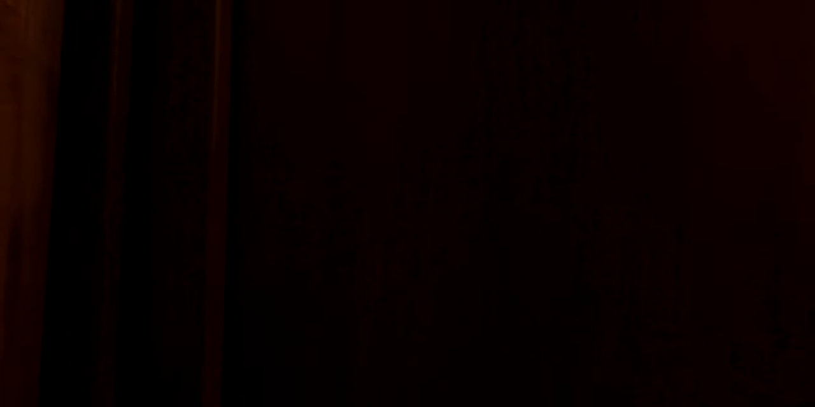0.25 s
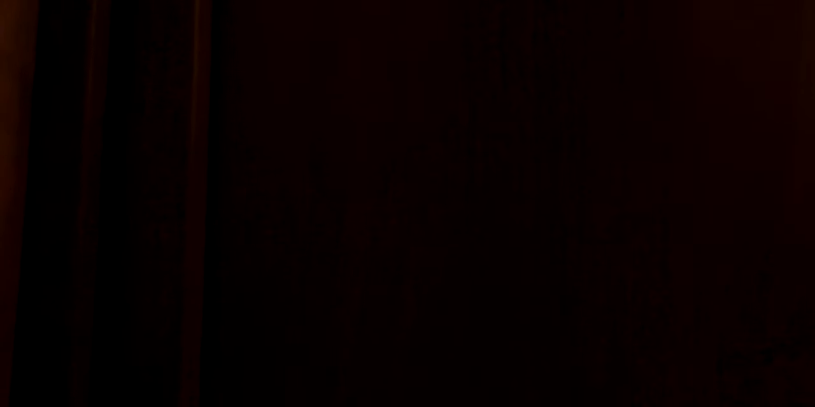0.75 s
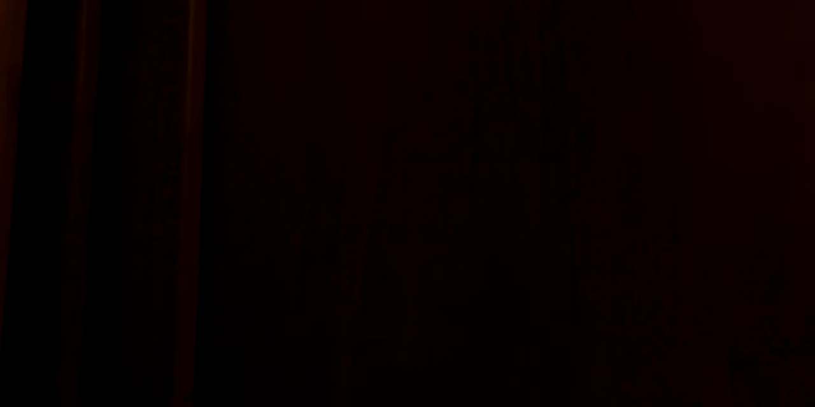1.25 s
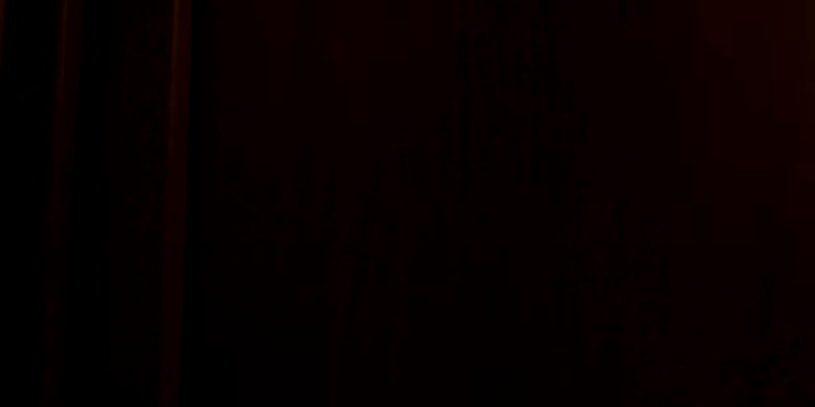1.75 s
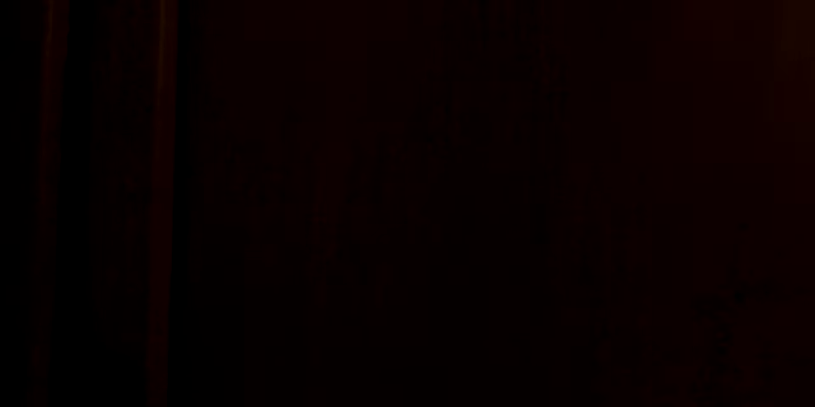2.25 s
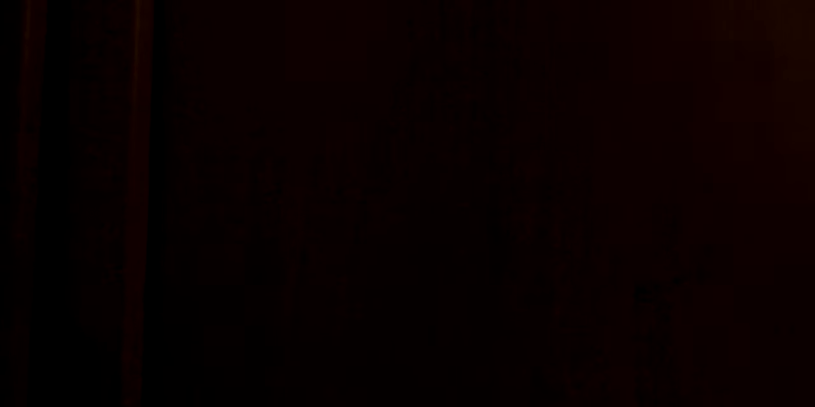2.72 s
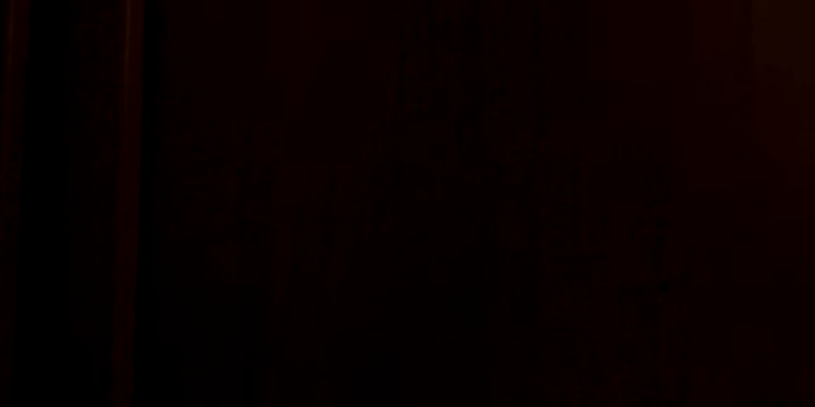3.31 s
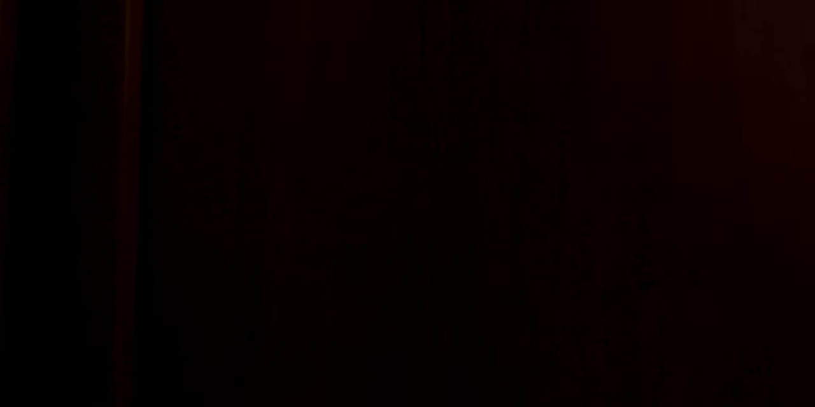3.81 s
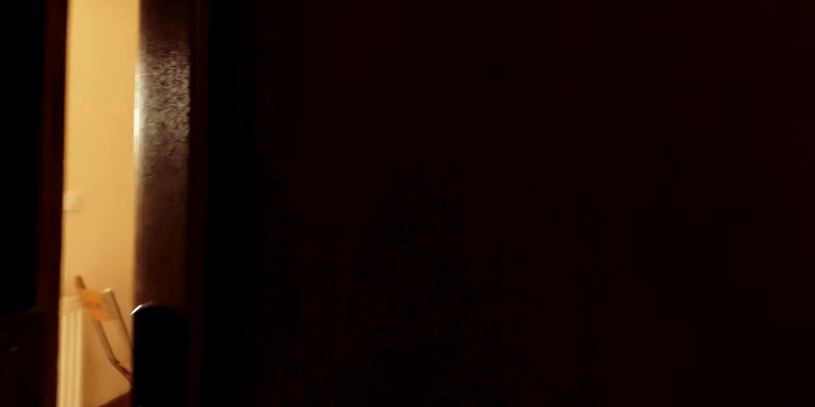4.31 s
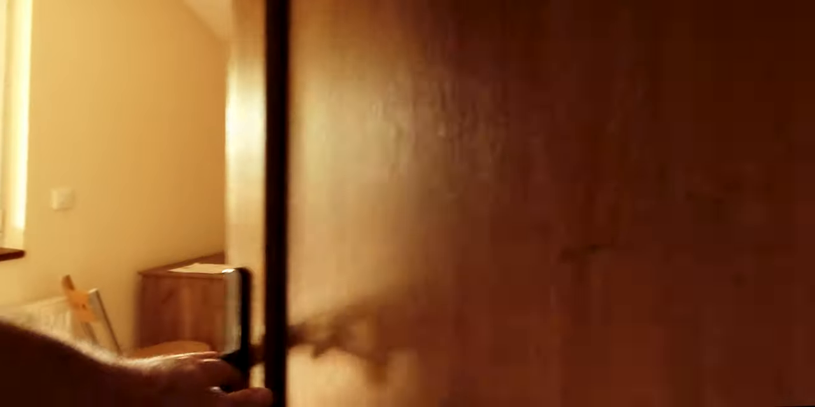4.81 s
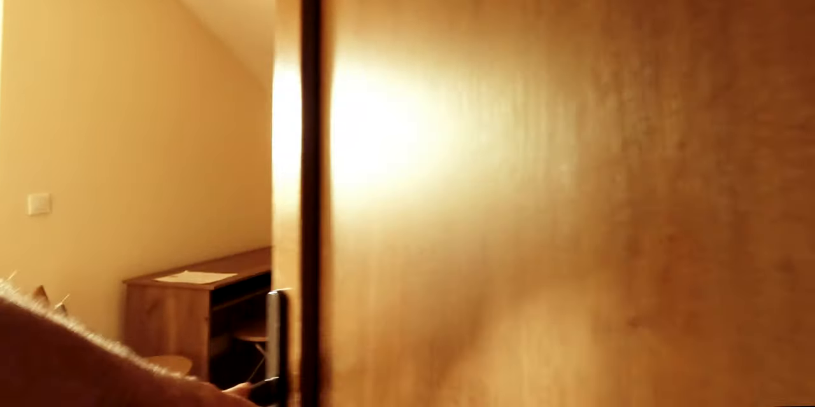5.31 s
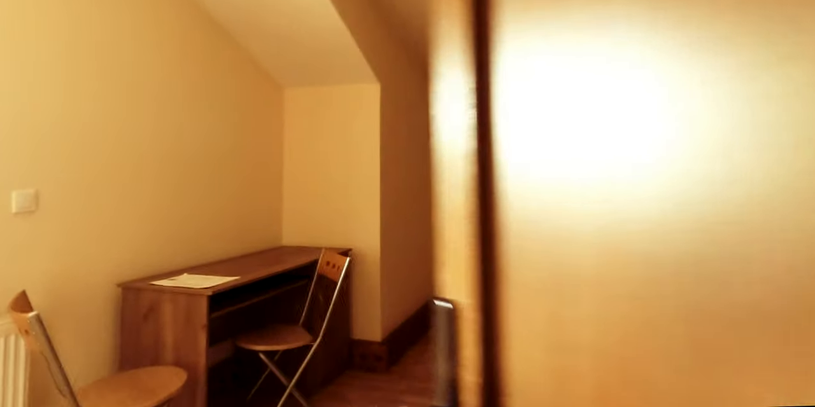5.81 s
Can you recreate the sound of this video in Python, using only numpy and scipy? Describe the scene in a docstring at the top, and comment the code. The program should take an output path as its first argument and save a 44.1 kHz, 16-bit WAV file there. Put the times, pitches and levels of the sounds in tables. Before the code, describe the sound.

Very close to a hand-held stereo microphone in a quiet, bare-walled hallway, keys jangle in dense, sharp, bright clicks, slightly to the left. Duller knocks and gritty scraping come from the lock, with low thumps of the wooden door and handling rumble. The rattling comes in bursts, thins after two seconds, flares again around three, then gives way to the door swinging open with a soft rub and a very faint high hinge whistle.

```python
"""A bunch of keys rattles while a hand works a door lock, close to a hand-held stereo microphone in a hallway.
Keys and lock are bodies with resonant modes, struck by short bursts of contact noise or rubbed by gritty noise.
Short metal tones and a faint, gliding hinge whistle are tones of wandering pitch; rubs also sing in narrow
bands. The pushed door leaf hums in its panel modes and the hand rumbles on the microphone, both as swelling
noise. Decaying noise gives the echo of the bare walls, over the steady quiet of the house."""
import sys
import numpy as np
from scipy import signal
from scipy.fft import rfft, irfft
from scipy.io import wavfile
from scipy.ndimage import uniform_filter1d

SR = 44100
rng = np.random.default_rng(int(sys.argv[2]) if len(sys.argv) > 2 else 0)


def log_audio(samples):
    """Write samples as a 16-bit WAV file to the path given in sys.argv[1]."""
    # one column per channel
    frames = np.atleast_2d(samples).T
    # limit to full scale, then quantise
    limited = np.clip(frames, -1, 1)
    pcm = np.round(limited * 32767).astype(np.int16)
    wavfile.write(sys.argv[1], SR, pcm)


N = 267234  # length of the scene [samples]

# resonant modes of the keys: (frequency [Hz], width [Hz], filter gain [dB])
KEY_MODES = [(3690, 280, 5.5), (4750, 260, 2.5), (5390, 220, 3.5), (5700, 285, 6.5), (7050, 105, -6.5),
             (7330, 190, 10), (9860, 1800, -6), (11630, 160, 10.5), (13070, 140, 12)]
# resonant modes of the lock case and the wood around it: (frequency [Hz], width [Hz], filter gain [dB])
LOCK_MODES = [(304, 43, 4.5), (419, 63.4, 4.5), (581, 118, 3), (718, 225, 1), (926, 140, 4.5),
              (1365, 500, 1), (1770, 530, 1), (2161, 466, 6), (2855, 2300, 0)]


def undb(db):
    """Level to amplitude: 20 dB is a factor of ten."""
    return 10 ** (np.asarray(db) / 20)


def unit(x):
    """Normalisation to a root-mean-square amplitude of one."""
    return x / np.sqrt(np.mean(x ** 2))


def pan(db):
    """Level difference between the ears: left over right [dB], shared equally by the two sides."""
    return undb(np.array([[db], [-db]]) / 2)


def wide(x, apart):
    """Mid-side stereo: the second noise row adds to the left and is taken from the right."""
    return x[0] + apart * x[1] * np.array([[1], [-1]])


def resonate(x, modes):
    """Modal superposition: second-order resonators (frequency, width, gain) summed with alternate signs."""
    out = 0
    for k, (hz, width, db) in enumerate(modes):
        mode = signal.lfilter(*signal.iirpeak(hz, hz / width, fs=SR), x)
        out = out + (-1) ** k * undb(db) * mode
    return out


def coloured(x, spectrum):
    """Spectral shaping: weights x by (frequency, level) points joined along log frequency."""
    hz, db = np.transpose(spectrum)
    f = np.maximum(np.arange(N // 2 + 1) * SR / N, 1)
    weight = undb(np.interp(np.log(f), np.log(hz), db))
    return irfft(rfft(x) * weight, N)


def grit(size, rough_db):
    """Rough contact: noise in grains of exponentially distributed level, many faint and a few sharp."""
    grains = np.repeat(rng.exponential(size=size // 32 + 1), 32)[:size]
    return rng.standard_normal(size) * undb(rough_db * grains)


def steady(x, window_s):
    """Envelope flattening: dividing by the running power removes the slow swells of noise."""
    return x / np.sqrt(uniform_filter1d(x ** 2, int(window_s * SR)))


def swells(table, rise_db_s, fall_db_s):
    """Exponential growth and decay: each row (full from, held, levels...) swells, holds, dies; powers add."""
    t = np.arange(0, N + 64, 64) / SR
    table = np.array(table)
    start, held, levels = table[:, :1], table[:, 1:2], table[:, 2:].T
    early = np.maximum(start - t, 0)
    late = np.maximum(t - start - held, 0)
    rises, falls = (np.broadcast_to(rate, len(levels)) for rate in (rise_db_s, fall_db_s))
    gains = []
    for db, rise, fall in zip(levels, rises, falls):
        row_gains = undb(db[:, None] - rise * early - fall * late)
        gain = np.sqrt(np.sum(row_gains ** 2, axis=0))
        gains.append(np.interp(np.arange(N) / SR, t, gain))
    return np.array(gains)


def blows(table, modes, spread_db, scatter_db, blow, rise_s, broad, body_db):
    """Impact excitation: a sharp blow and a dying rattle ring a body, mostly in modes near the row's centre."""
    out, size = np.zeros(N + SR), SR // 5
    t = np.arange(size) / SR
    for s, peak_db, centre_hz, t60 in table:
        decay = np.exp(-np.log(1000) * t / t60)
        contact = grit(size, 4.2) * decay * np.minimum(t / rise_s, 1)
        contact[0] += blow * np.sqrt(rise_s / t60)  # short events are nearly all blow
        # every blow lands elsewhere, so modes come with new strengths and slightly new pitch
        struck = []
        for hz, width, db in modes:
            detune, strength = rng.standard_normal(2)
            distance = abs(np.log2(hz / centre_hz))  # octaves
            struck.append((hz * (1 + 0.061 * detune), width, db + scatter_db * strength - spread_db * distance))
        # the contact itself is a broad hump around the centre, steep on both sides
        hump = [(centre_hz, broad * centre_hz, 0)]
        sound = resonate(resonate(contact, hump), hump) + undb(body_db) * resonate(contact, struck)
        # twice the short-time power is the squared peak of a tone
        envelope = 2 * uniform_filter1d(sound ** 2, size=int(3 * SR / centre_hz))
        start = int(s * SR)
        out[start:start + size] += undb(peak_db) * sound / np.sqrt(envelope.max())
    return out[:N]


def key_strikes():
    """Impact of stiff metal: keys tick to the left; the right side is shaded in the treble, with scatter."""
    # blows of the keys: (time [s], envelope peak before panning [dB], centre [Hz], rattle decay by 60 dB [s])
    key_blows = [(0.068, -36, 8350, 0.006), (0.0793, -30.5, 5400, 0.0092), (0.0863, -23, 8360, 0.016),
                 (0.191, -36, 7360, 0.03), (0.2335, -19.5, 7400, 0.036), (0.2449, -26, 8250, 0.019),
                 (0.2523, -9, 7850, 0.0041), (0.2574, -26, 7800, 0.0044), (0.2648, -14, 6250, 0.0085),
                 (0.2709, -15, 6740, 0.03), (0.2889, -15.5, 7640, 0.027), (0.3013, -32, 7500, 0.016),
                 (0.3066, -12, 7340, 0.0051), (0.3122, -13, 6800, 0.059), (0.436, -15.5, 7260, 0.0053),
                 (0.444, -6.5, 9400, 0.01), (0.5607, -30, 8910, 0.027), (0.5896, -24, 6800, 0.0088),
                 (0.6097, -27, 7150, 0.02), (0.6299, -35, 6100, 0.005), (0.6538, -28, 7100, 0.015),
                 (0.6826, -26, 8400, 0.017), (0.7016, -27, 6100, 0.054), (0.7269, -14.5, 7400, 0.025),
                 (0.7767, -14.5, 7300, 0.0074), (0.7842, -15, 7900, 0.017), (0.859, -17, 8900, 0.11),
                 (0.8705, -12, 6600, 0.019), (0.8751, -23.5, 2850, 0.025), (0.9008, -28, 4750, 0.0098),
                 (0.9145, -17.5, 7360, 0.011), (0.9756, -22, 7600, 0.012), (0.9864, -26, 5030, 0.078),
                 (0.9953, -20, 6540, 0.036), (1.0526, -26, 7900, 0.016), (1.095, -37, 8000, 0.006),
                 (1.1077, -23.5, 11570, 0.0078), (1.1366, -32, 10000, 0.079), (1.1995, -32, 6260, 0.041),
                 (1.2108, -34, 5300, 0.095), (1.2258, -13.5, 6600, 0.027), (1.2792, -31, 6010, 0.011),
                 (1.3091, -29, 4000, 0.02), (1.3194, -20, 5800, 0.016), (1.3264, -11, 6600, 0.042),
                 (1.353, -25, 6370, 0.029), (1.4976, -24, 8350, 0.066), (1.477, -28, 10000, 0.006),
                 (1.5021, -24, 7800, 0.096), (1.532, -21, 7740, 0.056), (1.6346, -28, 8000, 0.033),
                 (1.6662, -14.5, 4000, 0.011), (1.695, -18, 3700, 0.0077), (1.7206, -16, 7240, 0.0042),
                 (1.7299, -20.5, 6740, 0.051), (1.7537, -12.5, 7540, 0.03), (1.7852, -17.5, 4720, 0.016),
                 (1.8285, -14, 9140, 0.0072), (1.8424, -18.5, 6800, 0.066), (1.8489, -15.5, 6700, 0.032),
                 (1.8602, -33, 5200, 0.017), (1.8679, -21.5, 6540, 0.021), (1.896, -24.5, 10500, 0.006),
                 (1.938, -29, 9000, 0.008), (1.969, -37, 8800, 0.008), (1.9944, -13.5, 9000, 0.0071),
                 (2.0119, -23.5, 9000, 0.066), (2.2286, -31.5, 8140, 0.011), (2.385, -32.5, 5440, 0.027),
                 (2.4647, -27, 5540, 0.014), (2.4847, -29.5, 5950, 0.066), (2.548, -20, 5650, 0.11),
                 (2.5749, -13, 7600, 0.02), (2.7014, -22, 6250, 0.051), (2.7057, -18.5, 4900, 0.0048),
                 (2.7195, -16, 6300, 0.039), (2.7608, -28.5, 5900, 0.011), (3.035, -40, 9800, 0.0068),
                 (3.0766, -22, 5330, 0.011), (3.086, -21, 5950, 0.011), (3.0905, -13.5, 7100, 0.021),
                 (3.0981, -18, 5050, 0.021), (3.1247, -7.5, 6600, 0.011), (3.3105, -27, 11150, 0.0154),
                 (3.3427, -20.5, 9400, 0.027), (3.3502, -10.5, 8200, 0.0065), (3.444, -31, 9700, 0.0385),
                 (3.4554, -24.5, 8700, 0.02), (3.516, -28, 3500, 0.0082), (3.5279, -23.5, 2600, 0.012),
                 (3.6714, -16.5, 5430, 0.035), (3.7436, -22, 5400, 0.012), (3.7781, -14.5, 4650, 0.019),
                 (3.7865, -16.5, 5700, 0.059), (3.8026, -18, 5160, 0.052), (3.8433, -16, 6100, 0.041),
                 (3.85, -15.5, 5500, 0.027), (3.8583, -17, 5430, 0.018), (4.3162, -16, 6200, 0.051),
                 (4.3378, -33, 5800, 0.018), (4.4189, -27, 5390, 0.015), (4.4428, -28.5, 5560, 0.041),
                 (4.4545, -31, 5050, 0.12), (4.4602, -16.5, 6000, 0.04), (4.84, -27, 3900, 0.024),
                 (4.848, -26.5, 3980, 0.077), (4.9865, -24, 4400, 0.0093), (4.9901, -15, 4280, 0.014),
                 (5.3844, -35.5, 3530, 0.0063), (5.4015, -35, 3680, 0.034), (5.4731, -26.5, 7550, 0.0132)]
    keys = blows(key_blows + ticks(), KEY_MODES, spread_db=26.0, scatter_db=6.0, blow=38.2,
                 rise_s=0.00082, broad=0.89, body_db=-1.5)
    # leaf and frame scatter the keys' treble into the right side
    scatter_decay_s, scatter_level_db = 0.0011, -12.5
    scatter = rng.standard_normal(401) * np.exp(-np.arange(401) / SR / scatter_decay_s)
    scatter = np.diff(scatter, 2)  # favours the treble
    scattered = signal.lfilter(scatter / np.linalg.norm(scatter), 1, keys)
    shaded = signal.lfilter(*signal.butter(1, 8000, fs=SR), keys)
    return np.array([keys, shaded + undb(scatter_level_db) * scattered]) * pan(2.3)


def ticks():
    """Random impacts: faint chance ticks among the loose keys, their level following the sliding bunch."""
    count, over_slide_db, middle_hz, t60_s = 140, 13, 6900, 0.038
    when, size, tone = rng.random((count, 3)).T
    s = when * (N - 1) / SR
    bunch = sliding()[-1][(s * SR).astype(int)]
    db = 20 * np.log10(bunch) + over_slide_db - 2.2 * size
    hz = middle_hz * 2 ** np.clip(2.6 * (tone - .5), -1, 1)
    return [(a, b, c, t60_s) for a, b, c in zip(s, db, hz)]


def lock_knocks():
    """Impact on a heavier body: key, bolt and handle knock in the lock and ring its case and the wood."""
    # knocks: (time [s], envelope peak before panning [dB], centre [Hz], rattle decay by 60 dB [s])
    knocks = [(0.0816, -37.5, 930, 0.067), (0.1909, -39, 1070, 0.11), (0.2372, -30, 1110, 0.12),
              (0.2703, -22, 670, 0.051), (0.5899, -45, 750, 0.25), (0.6236, -38.5, 476, 0.11),
              (0.6944, -37, 736, 0.023), (0.7271, -28, 910, 0.097), (0.7947, -31.5, 1120, 0.037),
              (0.8709, -25.5, 1070, 0.13), (0.9773, -27.5, 1680, 0.23), (0.9896, -25.5, 1210, 0.11),
              (1.1617, -39, 910, 0.12), (1.2104, -26, 1150, 0.064), (1.227, -38, 990, 0.11),
              (1.2782, -29, 910, 0.71), (1.312, -29, 1280, 0.096), (1.331, -25, 2520, 0.04),
              (1.5354, -32, 850, 0.085), (1.73, -34.5, 800, 0.26), (1.7537, -29, 770, 0.047),
              (1.8439, -28.5, 765, 0.26), (1.8604, -19, 2260, 0.04), (2.2939, -42, 820, 0.052),
              (2.5524, -33, 1090, 0.088), (2.5758, -29, 1090, 0.042), (2.7207, -31.5, 1440, 0.026),
              (3.0921, -28, 2180, 0.03), (3.1257, -30, 800, 0.047), (3.3494, -36.5, 920, 0.073),
              (3.4629, -44, 635, 0.028), (3.5269, -29.5, 1680, 0.039), (3.516, -46, 690, 0.02),
              (3.672, -28, 750, 0.059), (3.7455, -23.5, 725, 0.049), (3.788, -26.5, 1280, 0.14),
              (4.3162, -46, 1900, 0.06), (4.4542, -33, 1530, 0.09), (4.532, -34.5, 1574, 0.22),
              (4.5754, -33.5, 390, 0.028), (5.2, -49, 1370, 0.1), (5.999, -44.5, 260, 0.055)]
    lock = blows(knocks, LOCK_MODES, spread_db=12.5, scatter_db=3.0, blow=29.6,
                 rise_s=0.0028, broad=0.41, body_db=10.5)
    return lock * pan(3.9)


def sliding():
    """Friction strength over time: gains of the rub in wood, bolt, lock case and bunch."""
    # slides of key and bunch: (full strength from [s], held [s], wood round the lock [dB], bolt [dB],
    # lock case [dB], keys over each other [dB])
    slides = [(0.0, 0.0043, -49, -45, -55.5, -56.5), (.27, 0.085, -47, -46.5, -49, -47.5),
              (.62, 0.14, -53, -49.5, -79, -50), (.89, 0.01, -47, -41.5, -52, -46.5),
              (1.0, 0.017, -54.5, -50, -47, -73), (1.25, 0.12, -58, -45.5, -47, -48.5),
              (1.34, 0.15, -56.5, -44.5, -44.5, -51.5), (1.62, 0.27, -67, -77, -78, -51),
              (1.87, 0.084, -50.5, -48, -51, -78), (2.02, 0.023, -77, -60, -64, -62),
              (2.24, 0.18, -65, -64, -79, -54.5), (2.44, 0.12, -72, -65, -70, -55.5),
              (2.59, 0.022, -49, -50.5, -45, -53), (2.71, 0.0071, -56.5, -49, -45.5, -52),
              (3.03, 0.03, -67, -60.5, -62, -59.5), (3.13, 0.023, -52, -46.5, -46.5, -50),
              (3.22, 0.1, -54, -52.5, -54, -66), (3.4, 0.062, -78, -62, -63, -49.5),
              (3.54, 0.12, -66, -52.5, -47.5, -76), (3.73, 0.12, -51.5, -45, -48.5, -55.5),
              (4.05, 0.21, -73, -73, -66, -65.5), (4.36, 0.27, -64.5, -72, -59, -53),
              (4.54, 0.079, -56, -54.5, -50, -55.5), (5.02, 0.013, -79, -80, -63, -47.5)]
    # the door rubs as it swings open and slows: same columns
    swing = [(5.05, 0.37, -69.5, -64.5, -60, -56.5)]
    # rates [dB/s]
    slide_gains = swells(slides, rise_db_s=(214, 228, 289, 163), fall_db_s=(129, 124, 114, 89))
    swing_gains = swells(swing, rise_db_s=14, fall_db_s=(43.4, 40, 20.6, 21.1))
    return np.hypot(slide_gains, swing_gains)


def scrape():
    """Friction noise: gritty rubbing excites wood, bolt and metal case; loose keys slide over each other."""
    # spectrum of sliding keys: (frequency [Hz], relative level per hertz [dB])
    slide_spectrum = [(2500, -6), (4500, 1), (6000, 6), (7600, 0.5), (9500, -4), (12000, -1), (14500, -44)]
    *lock_gains, keys_gain = sliding()
    parts = LOCK_MODES[:3], LOCK_MODES[3:6], LOCK_MODES[6:]  # wood, bolt, case
    lock = 0
    for gain, modes, apart in zip(lock_gains, parts, (0.25, 0.4, 0.55)):
        rub = [unit(resonate(resonate(grit(N, 2.18), modes), modes)) for _ in range(2)]
        lock = lock + gain * wide(rub, apart)
    keys = []
    for _ in range(2):
        hiss = unit(coloured(grit(N, 0.88), slide_spectrum))
        ringing = unit(resonate(grit(N, 4.0), KEY_MODES))
        keys.append(hiss + undb(-8.5) * ringing)
    return lock * pan(1.0) + keys_gain * wide(np.array(keys), 0.58) * pan(3.5)


def rasps():
    """Resonant friction: each rub catches one narrow band of lock, leaf or bunch, steep on both sides."""
    # rubs: (full strength from [s], held [s], frequency [Hz], resonator width [Hz], level before panning [dB])
    rubs = [(1.3, 0.21, 910, 200, -50), (1.875, 0.14, 2120, 350, -47.5), (2.24, 0.56, 4760, 300, -64),
            (2.3, 0.24, 5800, 400, -64), (3.14, 0.16, 920, 200, -53.5), (3.17, 0.1, 320, 70, -49),
            (3.54, 0.11, 2900, 1300, -58), (4.56, 0.057, 1106, 200, -50.5), (4.81, 0.063, 425, 70, -55),
            (5.28, 0.051, 309, 90, -54.5)]
    out = 0
    for s, held, hz, width, db in rubs:
        band = [(hz, width, 0)]
        sound = unit(resonate(resonate(grit(N, 1.13), band), band))
        out = out + swells([(s, held, db)], rise_db_s=397, fall_db_s=159) * sound
    return out * pan(2.8)


def squeals():
    """Tones of wandering pitch: a short metal squeal, brief thin tones above 11 kHz, and the gliding whistle of
    the hinge."""
    # short metal tones: (start [s], length [s], frequency [Hz], peak level before panning [dB])
    metal = [(0.867, 0.039, 4473, -33.5), (3.24, 0.0085, 11300, -45), (3.26, 0.0099, 11500, -46),
             (3.32, 0.042, 11500, -40), (3.24, 0.009, 12800, -49), (3.328, .02, 12650, -47)]
    # hinge whistle: (time [s], frequency [Hz], level before panning [dB])
    hinge = [(5.54, 9000, -130), (5.63, 9850, -71), (5.71, 10030, -71), (5.73, 9820, -73),
             (5.81, 9900, -73), (5.86, 10460, -71), (5.9, 10460, -72), (5.95, 9200, -78),
             (5.97, 9000, -130)]
    t = np.arange(N) / SR
    wobble = 1 + 0.0035 * unit(uniform_filter1d(rng.standard_normal(N), 200))  # wandering pitch
    out = 0
    for s, length, hz, db in metal:
        tone = np.sin(2 * np.pi * hz * np.cumsum(wobble) / SR)
        arch = np.sqrt(np.clip(1 - (2 * (t - s) / length - 1) ** 2, 0, 1))
        out = out + undb(db) * tone * arch
    s, *columns = np.transpose(hinge)
    hz, db = (np.interp(t, s, column) for column in columns)
    whistle = undb(db) * np.sin(2 * np.pi * np.cumsum(hz * wobble) / SR)
    return (out + whistle) * pan(9.1)


def door_leaf():
    """Plate vibration: pushes set the leaf humming in its low and upper panel modes."""
    # low and upper panel modes: (frequency [Hz], width [Hz], filter gain [dB])
    low_modes = [(125.9, 12.8, 9.5), (156.5, 65, 0.5)]
    high_modes = [(191.4, 12.2, 2), (279, 78, -7), (306.1, 23.4, -2)]
    # pushes: (full strength from [s], held [s], hum [dB], upper modes [dB])
    pushes = [(0.0, 0.018, -27, -38.5), (.27, 0.0042, -30, -41), (.37, 0.015, -46, -41),
              (.53, 0.099, -54, -66), (.76, 0.013, -42.5, -45.5), (.93, 0.012, -50, -46),
              (1.06, 0.0052, -37, -50.5), (1.3, 0.15, -43.5, -54), (1.8, 0.02, -42.5, -51),
              (1.9, 0.015, -55, -38.5), (2.05, 0.058, -50, -74), (2.4, 0.015, -51.5, -66),
              (2.6, 0.017, -41, -48), (3.17, 0.025, -50.5, -52), (3.3, 0.12, -66, -62),
              (3.69, .03, -43.5, -40), (3.77, 0.0051, -34.5, -36), (3.9, 0.064, -34, -60),
              (4.14, 0.2, -49, -67), (4.61, 0.029, -37.5, -49), (4.82, 0.042, -51, -58),
              (5.28, 0.11, -56.5, -59), (6.02, 0.011, -42, -62)]
    rest_db = (-72.5, -73)  # hum and upper modes between pushes
    push_gains = swells(pushes, rise_db_s=(288, 323), fall_db_s=(145, 170))
    low_gain, high_gain = push_gains + undb(rest_db)[:, None]
    low, high = (resonate(resonate(rng.standard_normal(N), m), m) for m in (low_modes, high_modes))
    return low_gain * steady(low, 0.11) + high_gain * steady(high, 0.21)


def hand():
    """Handling noise: the hand shifts on the microphone, heard as low bands of rumble and thud."""
    # jolts: (full strength from [s], held [s], rumble [dB], thud [dB])
    jolts = [(0.0, 0.11, -33.5, -43.5), (.24, 0.017, -22.5, -30), (.4, 0.012, -26.5, -38),
             (.6, 0.012, -29.5, -64), (1.04, .15, -37.5, -54), (1.4, .2, -46.5, -78),
             (2.1, 0.02, -36, -51.5), (2.42, 0.21, -27.5, -51), (2.8, .2, -42.5, -91),
             (3.72, 0.035, -52, -38), (4.1, 0.0086, -26.5, -37.5), (4.25, 0.18, -52, -46),
             (4.62, 0.024, -49, -40), (4.8, 0.021, -48, -40.5), (4.97, 0.027, -40, -38),
             (5.15, 0.089, -44.5, -55), (5.4, 0.01, -41, -39.5), (6.03, .02, -75, -63)]
    rest_db = (-56.5, -65)  # rumble and thud between jolts
    jolt_gains = swells(jolts, rise_db_s=(132, 186), fall_db_s=(122, 185))
    rumble_gain, thud_gain = jolt_gains + undb(rest_db)[:, None]

    def band_noise(edges_hz):
        """Band-limited noise of flattened envelope, in two independent rows."""
        band = signal.butter(3, edges_hz, "band", fs=SR, output="sos")
        return np.array([steady(signal.sosfilt(band, rng.standard_normal(N)), 0.075) for _ in range(2)])

    rumble, thud = band_noise((7., 24.2)), band_noise((36., 84.0))
    return rumble_gain * wide(rumble, 0.13) + thud_gain * wide(thud, 0.19)


def hall_echo(near):
    """Diffuse reverberation: bare walls answer as decaying noise, duller than the direct sound."""
    t60_s, wet_db, dull_hz = 0.16, -8.5, 7400
    t = np.arange(SR // 2) / SR
    decay = np.exp(-np.log(1000) * t / t60_s) * np.minimum(t / 0.0072, 1)
    tail = wide(rng.standard_normal((2, len(t))) * decay, 0.44)
    tail = signal.lfilter(*signal.butter(1, dull_hz, fs=SR), tail)
    tail = tail / np.sqrt(np.sum(tail ** 2) / 2)  # unit energy per side on average
    source = near.mean(axis=0, keepdims=True)
    return undb(wet_db) * signal.fftconvolve(source, tail, axes=1)[:, :N]


def house_quiet():
    """Stationary background noise: the quiet of the house as spectrally shaped noise."""
    # spectrum: (frequency [Hz], relative level per hertz [dB])
    quiet_spectrum = [(120, -57), (155, 3), (200, 7), (821, -28), (5130, -23), (8740, -36), (10100, -30),
                      (14300, -25), (16000, -52)]
    quiet = np.array([unit(coloured(rng.standard_normal(N), quiet_spectrum)) for _ in range(2)])
    return undb(-71) * wide(quiet, 0.81)


def scene():
    """Superposition of all sources; the impacts and squeals also feed the hall echo."""
    near = key_strikes() + lock_knocks() + squeals()
    return near + scrape() + rasps() + door_leaf() + hand() + hall_echo(near) + house_quiet()


def record(dry):
    """Saturation and band limit: the microphone rounds the loudest peaks and cuts the top."""
    ceiling, top_hz = .22, 15500
    rounded = ceiling * np.tanh(dry / ceiling)
    return signal.sosfilt(signal.ellip(8, .2, 70, top_hz, fs=SR, output="sos"), rounded)


dry = scene()
out = record(dry)
log_audio(out)
```